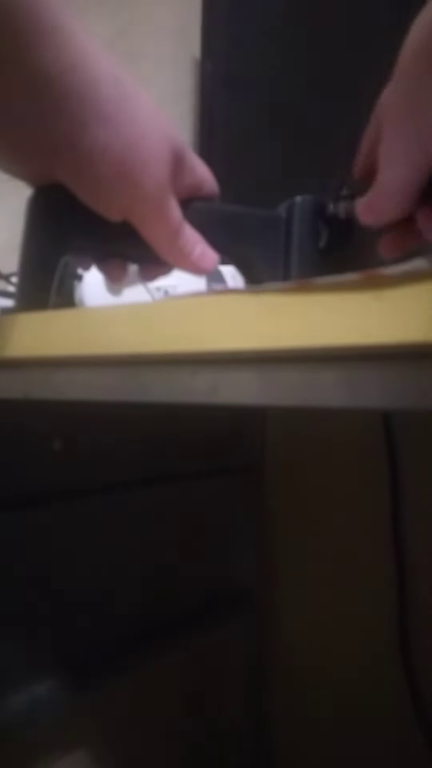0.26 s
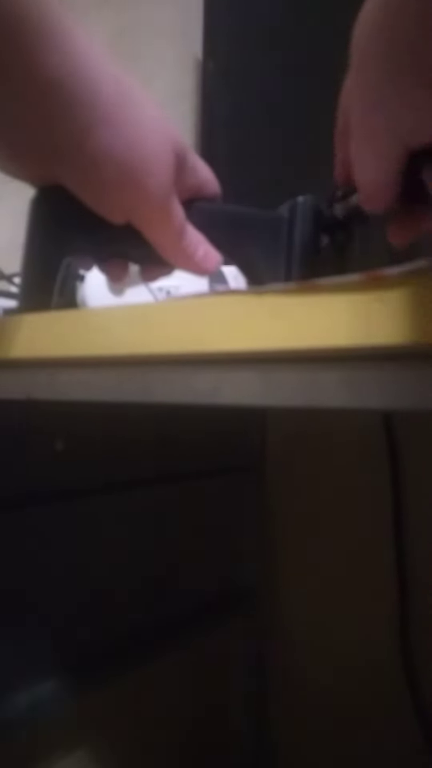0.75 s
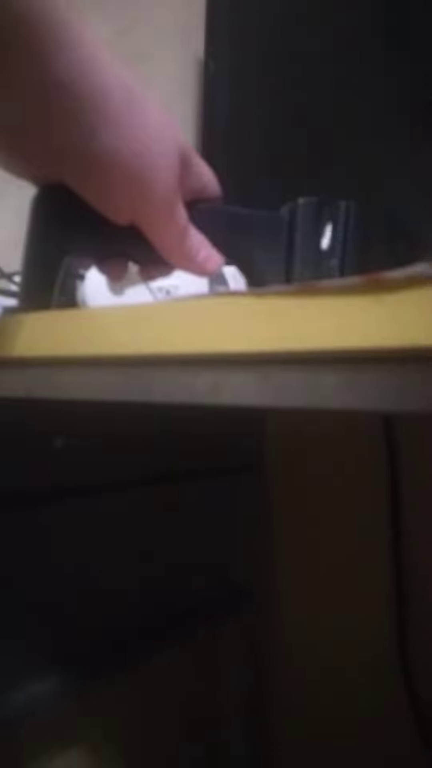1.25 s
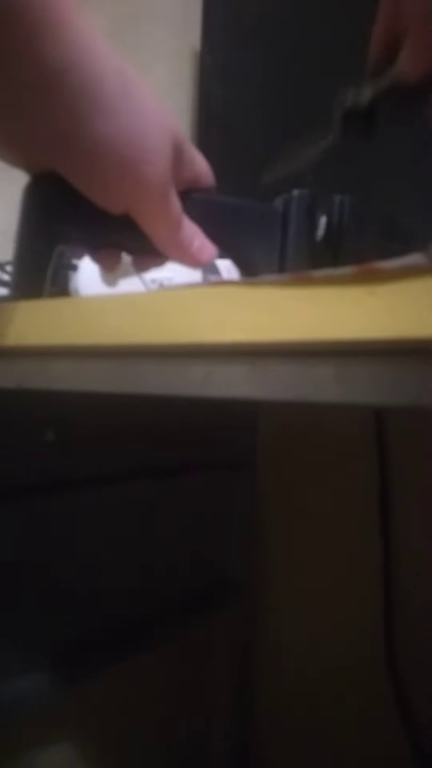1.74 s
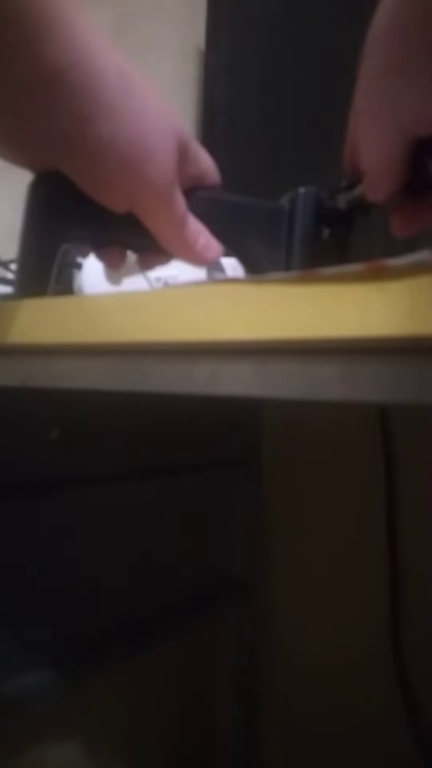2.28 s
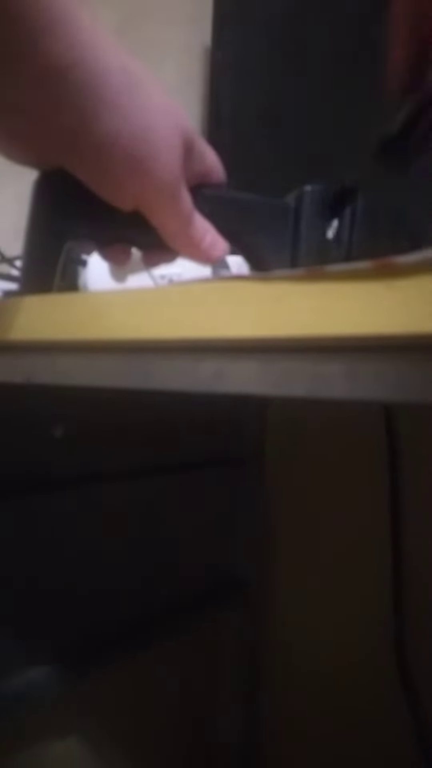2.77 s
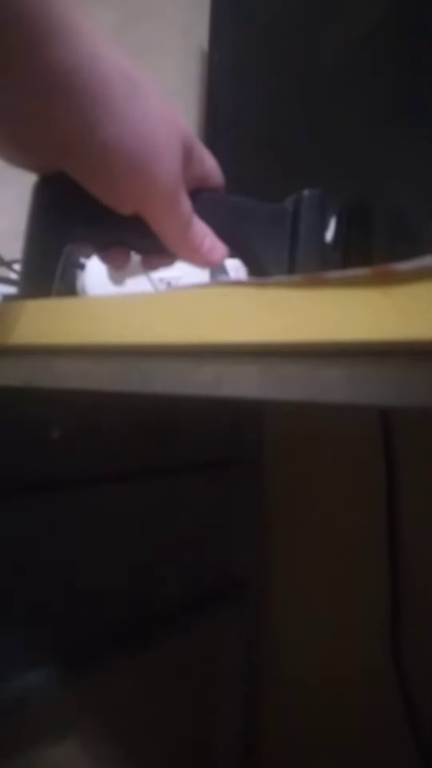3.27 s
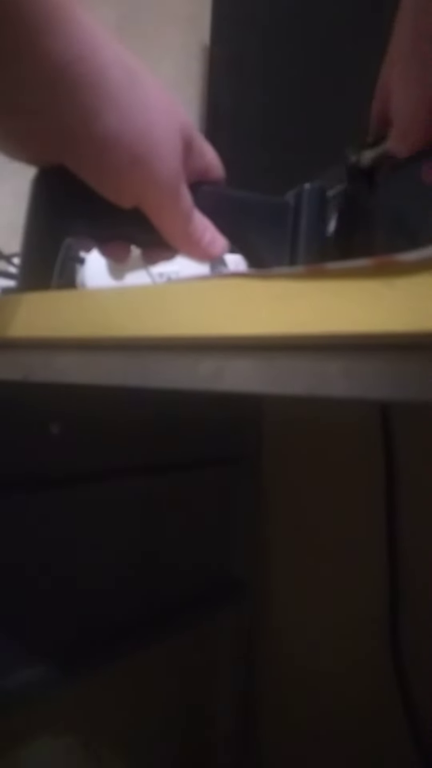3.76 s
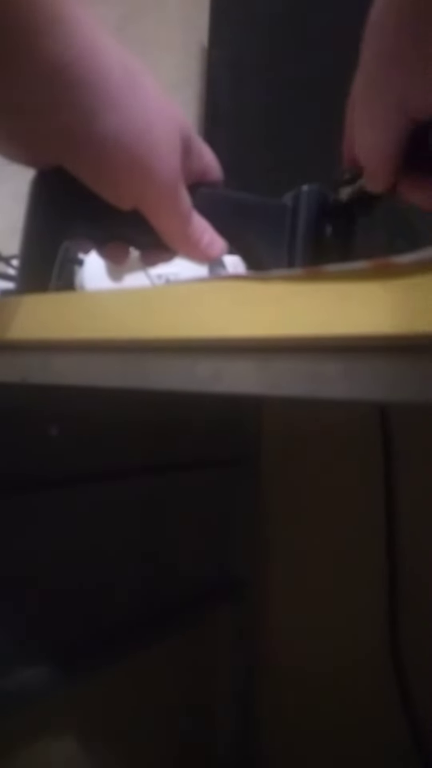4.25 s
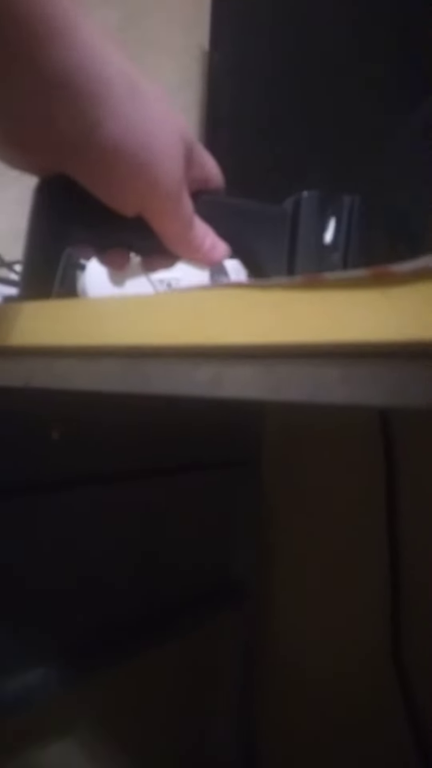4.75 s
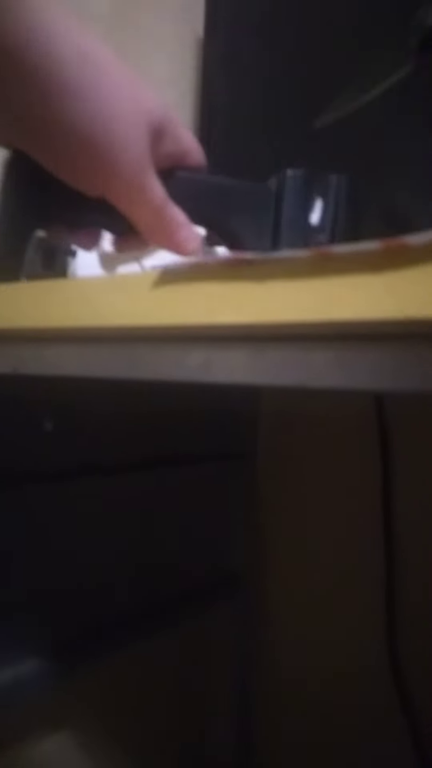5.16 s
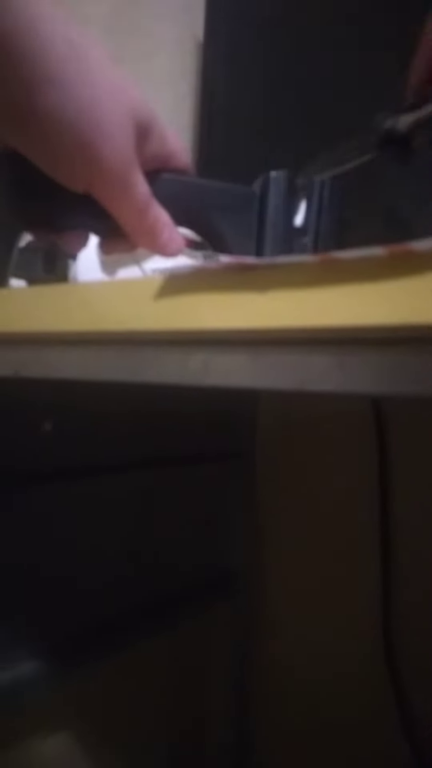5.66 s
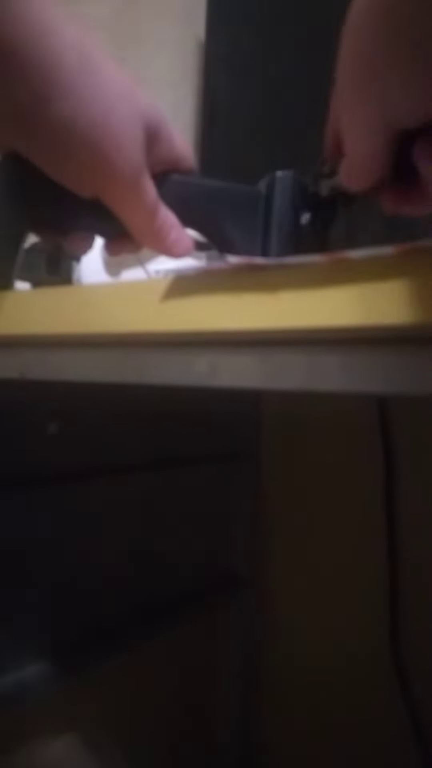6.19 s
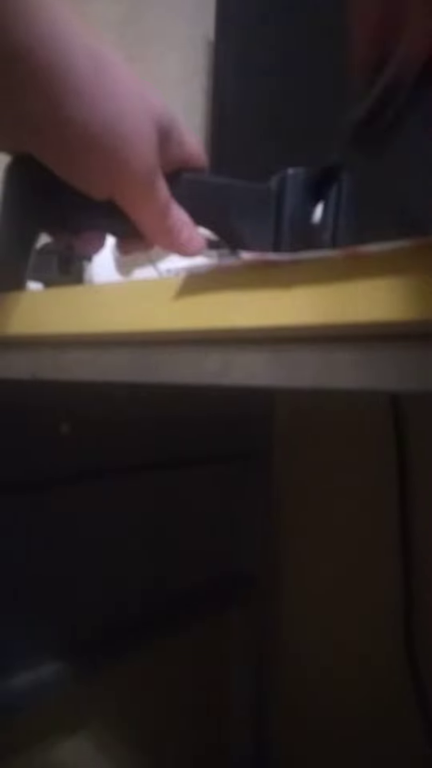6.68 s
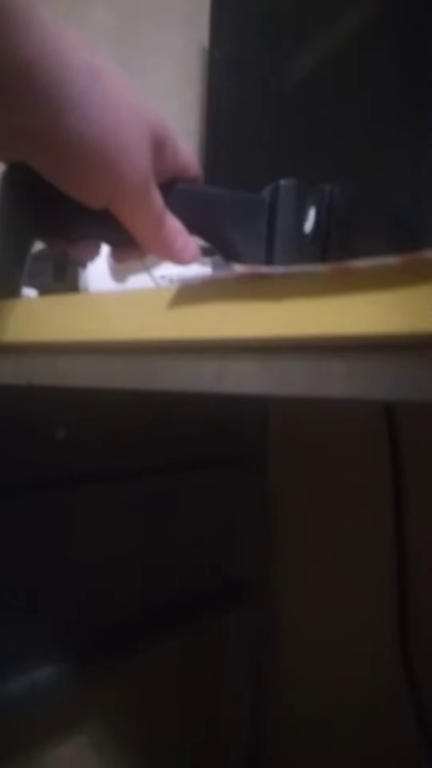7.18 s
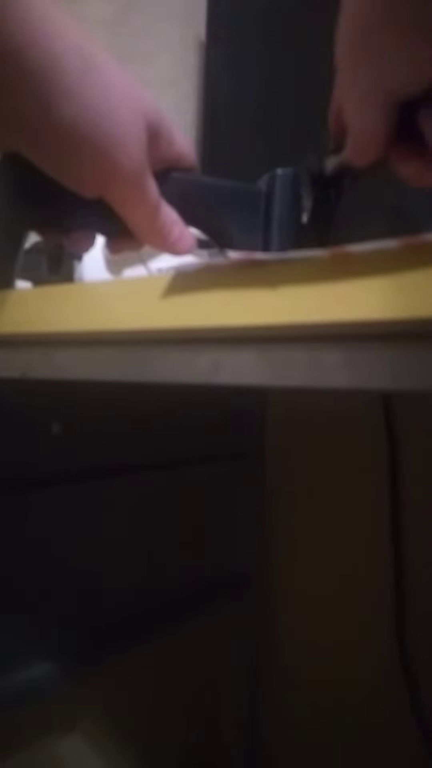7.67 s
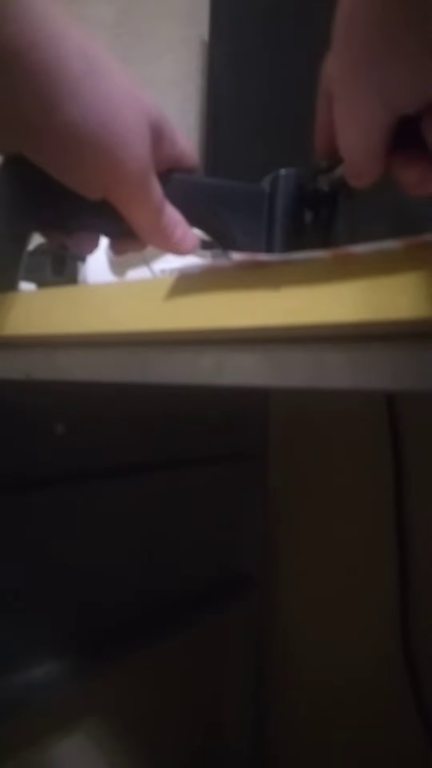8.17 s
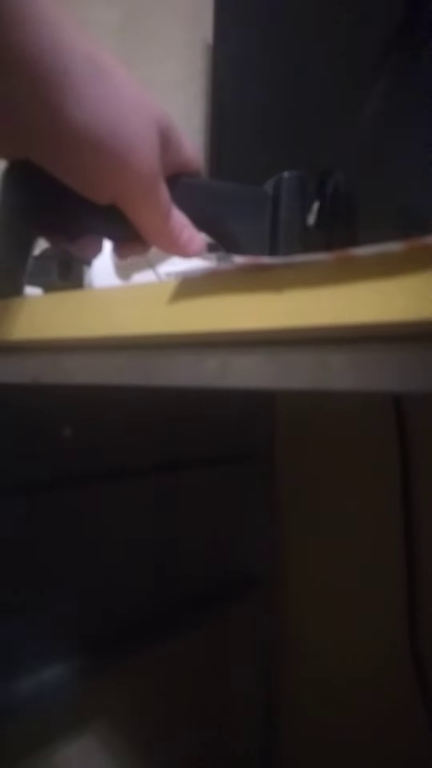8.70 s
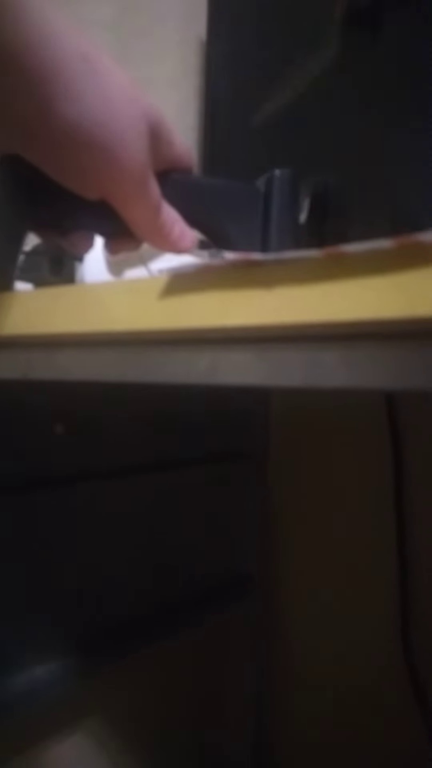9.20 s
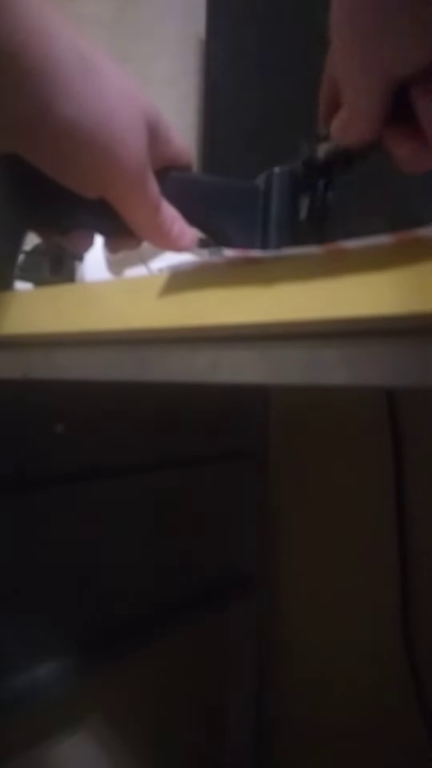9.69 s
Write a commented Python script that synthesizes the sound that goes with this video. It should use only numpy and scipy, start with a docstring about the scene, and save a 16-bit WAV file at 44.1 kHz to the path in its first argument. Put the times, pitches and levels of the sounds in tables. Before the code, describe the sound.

A blade is set into a plastic pull-through sharpener with a hollow thud and a bit of steel clatter, rests, then is drawn out in a short accelerating scrape that cuts off sharply. This repeats five times with uneven knocks and short near-silent gaps. The tabletop adds woody weight, and the freed tip sometimes clacks on the rim. Recorded close by a phone, sharpener stronger on one side, with short room echo and bassy hum.

```python
"""First a low, wavering room rumble, then knocks as a steel knife meets a plastic pull-through sharpener.
The blade is drawn over the grit five times. Bursts of noise make the knocks, random grains the strokes;
both ring housing, tabletop and blade in a small quiet room. Later the freed tip clacks on the rim.
A few dry ticks sound right at the phone lying close by, which hears with a near and a far port.
The phone widens the stereo by taking a delayed copy of each port from the other."""
import sys
import numpy as np
from scipy import signal
from scipy.fft import rfft, irfft, next_fast_len
from scipy.io import wavfile
from scipy.ndimage import uniform_filter1d

SR = 44100
rng = np.random.default_rng(int(sys.argv[2]) if len(sys.argv) > 2 else 0)


def store_pcm(level_fs):
    """Save levels as 16-bit WAV."""
    pcm = np.round(np.clip(level_fs, -1, 1) * 32767).astype(np.int16)
    wavfile.write(sys.argv[1], SR, np.atleast_2d(pcm).T)


def gain_from_db(level_db):
    """Turn a decibel level (scalar or array-like) into a linear amplitude factor."""
    decades = np.asarray(level_db, float) / 20
    return 10 ** decades


N = 438354  # length in samples

# background at the ports: (frequency [Hz], near port [dB per Hz], far port [dB per Hz], shared tone [dB per Hz])
BACKGROUND = [(24.8, -107, -103, -110), (45.5, -88, -81, -72.5), (71.4, -65, -82, -66),
              (109.7, -62, -65, -71.5), (162.5, -88.5, -74.5, -82), (230, -80, -100.5, -77.5),
              (467, -89.5, -100, -92), (730, -93.5, -121, -97), (1360, -104, -102, -112),
              (3110, -109, -107, -125), (6700, -116, -114, -135), (11700, -120, -118, -140),
              (12300, -117, -117, -140), (13400, -123, -121, -140)]
# low appliance tone: (frequency [Hz], level [dB])
APPLIANCE_TONES = [(75.4, -52)]
# knocks: (time [s], thud [dB], housing [dB], blade [dB], rattle decay [ms])
KNOCKS = [(0.138, -26.5, -39.5, -65, 0.68), (0.363, -34.5, -57, -81, 3.8),
          (0.514, -15.5, -25.5, -33.5, 4.4), (0.981, -42, -64, -49, 7.6), (1.149, -66, -47, -43, 1.7),
          (1.833, -26, -45, -78, 5.3), (1.9, -41.5, -57, -65, 2.3), (2.155, -23, -30.5, -37, 4.4),
          (2.261, -32, -37.5, -56, 5.9), (2.81, -37, -40.5, -48, 4), (3.575, -25.5, -39.5, -79, 3.9),
          (3.889, -16.5, -22, -27.5, 2.5), (4.024, -34.5, -35, -59, 2), (4.602, -32.5, -38, -35, 4.6),
          (5.765, -27, -38, -61, 5), (5.878, -39, -52, -59, 5), (6.028, -29, -42, -46, 7.7),
          (6.085, -29.5, -45, -43, 6.3), (6.111, -19.5, -27, -30.5, 3.15),
          (6.236, -32.5, -37.5, -53.5, 1.8), (6.724, -28.5, -42, -36.5, 5.8), (7.669, -39, -52, -75, 2.4),
          (7.721, -32.5, -40.5, -66, 3.4), (7.957, -37.5, -50, -66, 4.8), (7.996, -15, -17.5, -28, 3),
          (8.316, -55, -41.5, -63, 1.7), (8.693, -29.5, -46, -53, 1.3), (9.796, -26, -37, -40, 3)]
# the freed tip clacks on the rim: (time [s], thud [dB], housing [dB], blade [dB], rattle decay [ms])
CLACKS = [(4.647, -43, -38.5, -37, 5.7), (6.792, -47, -28.5, -34, 5.3), (8.801, -43, -31, -42.5, 5),
          (8.843, -60, -44.5, -51, 6.3)]
# middles of the thud, housing, blade and finest-treble bands: (frequency [Hz])
KNOCK_BANDS_HZ = [330, 1200, 3000, 10000]
# ringing of housing and tabletop: (frequency [Hz], level [dB], time to fall 60 dB [s], extra when rubbed [dB])
HOUSING = [(113, -3.5, 0.2, 0.5), (217, -9.5, 0.16, 6), (262.3, 3.5, 0.12, -2.5), (342, -3, 0.08, 2),
           (395.7, -2, 0.038, 2), (443.5, 1, 0.053, -2.5), (496.6, 0, 0.037, -1),
           (590.6, -16.5, 0.073, 8.5), (695, 0.5, 0.027, 1.5), (819, -12, 0.047, 0.5),
           (867, -1, 0.04, -0.5), (1015, -4, 0.019, 12), (1175, 2, 0.017, -0.5), (1295, -6.5, 0.058, -2),
           (1410, -9.5, 0.031, 5), (1580, -3, 0.0098, 5.5), (1896, -5, 0.025, -3)]
# ringing of the blade: (frequency [Hz], level [dB], time to fall 60 dB [s])
BLADE = [(1980, -2.5, 0.016), (2547, -3.5, 0.018), (3024, -4.5, 0.022), (3380, -9.5, 0.036),
         (3860, -8.5, 0.045), (4195, 1, 0.022), (5000, -14.5, 0.044), (5910, -3.5, 0.017),
         (7730, -1.5, 0.0078), (8900, -4, 0.0051), (12700, -7, 0.008)]
# ringing of the rim: (frequency [Hz], level [dB], time to fall 60 dB [s])
RIM = [(493, -7, 0.044), (793, -7.5, 0.042), (909, 4.5, 0.024), (1070, -1, 0.013), (1350, -13, 0.052),
       (1380, 1, 0.041), (1770, 0, 0.045), (2535, 1.5, 0.035), (3543, 1.5, 0.023), (4360, -10, .02),
       (5620, 0, .03), (7460, -8, .015), (9300, -19, .015)]
# echo of the room: (frequency [Hz], time to fall 60 dB [s])
ROOM = [(100, 0.12), (500, 0.51), (2000, 0.29), (6000, 0.23), (14000, 0.087)]
# colour of the grit's hiss: (frequency [Hz], relative level [dB per Hz])
HISS = [(1500, 17), (2300, 12.5), (4500, 18), (7000, 8), (11000, 11.5), (14500, -2)]
# draws: (starts to move [s], at full speed [s], tip leaves [s], housing change [dB], steel change [dB])
DRAWS = [(0.856, 1.03, 1.146, -0.5, 1), (2.512, 2.76, 2.83, -4, 0), (4.32, 4.55, 4.598, -2.5, 0),
         (6.468, 6.659, 6.725, 0.5, 0), (8.489, 8.59, 8.692, 1.5, 0.5)]
# short slides, most of them ending in a knock: (start [s], end [s], level change [dB])
SLIDES = [(0.433, 0.518, 1), (6.035, 6.107, 1), (7.624, 7.723, -4), (7.937, 7.996, 2.5),
          (9.913, 9.942, -5.5)]
# Each list below has one number for tabletop rumble, housing drag, blade rasp and fine hiss, in this order.
# level of a draw at full speed: (level [dB])
FULL_DB = [-42.5, -47, -45.5, -54.5]
# gain from the start of a draw to full speed: (gain [dB])
SWELL_DB = [27, 24, 29.3, 29.5]
# bend of that gain; over 1, most of it comes early: (exponent [no unit])
SWELL_BEND = [1.2, 1.16, 0.96, 0.93]
# change on the way to the thin tip: (change [dB])
TIP_DB = [-8, -12.5, -2, 4.5]
# fall after the tip has left: (speed of fall [dB per s])
LIFT_DB_PER_S = [200, 400, 810, 1010]
# blade resting in the slot, pressed by the hand: (level [dB])
SEATED_DB = [-54.5, -74, -83, -97]
# level at the end of a slide: (level [dB])
SLIDE_DB = [-38, -48, -53.5, -67]
# the blade settling after a knock, against that knock: (level [dB])
SHUDDER_DB = [-8.5, -13.5, -15, -23]
# how fast the settling fades: (speed of fall [dB per s])
SHUDDER_DB_PER_S = [169, 242, 230, 260]
# faint rustle with the knife in the air: (start [s], end [s], levels of the four layers [dB])
RUSTLE = (5.03, 5.25, [-81, -77, -70.5, -75])
# ticks at the phone: (time [s], snap [dB], fizz [dB], far against near port [dB], decay [ms])
TICKS = [(1.527, -27, -30, -19, 0.063), (5.699, -61, -79, -4, 0.25), (8.318, -37, -44, -14, 0.33)]
# far port against near port: (frequency [Hz], level [dB])
SHADOW = [(100, -11), (400, -11), (1000, -4.5), (3000, -38), (14000, -27)]
# how much of the other port is taken away: (frequency [Hz], share [no unit])
WIDEN = [(100, 0.49), (1000, 0.67), (2100, 0.87), (4200, 0.65), (6300, 0.47), (8400, 0.18), (10500, 0.024),
         (14000, 0.06)]

RISE_MS, CRACK_MS, CRACK_DB, BLOW_DB, SCATTER_DB = 2.1, 0.8, 18, -7, 1.5
KNOCK_EDGE_DB, CLACK_EDGE_DB = -2.5, -14  # the finest treble against the blade
ROOM_DB, ROOM_SHARED_HZ = -10, 520  # below this frequency the ports mostly share their echo
GRIT_PER_S, GRIT_DB, JUDDER_DB = 6000, 3.5, 2.2  # grains on average; spread of grain size and of pressure
SEATED_S, FIDGET_DB = 0.38, 2.5  # rest before a draw; unevenness of the hand
SLIDE_SWELL_DB, SHUDDER_RISE_S = 21, 0.0047
SING_HZ, SING_T60_S, SING_DB, SING_SWELL_DB = 992, 0.044, -51.5, 10.5
FAR_LAG_MS, TONE_LAG_MS, WIDEN_LAG_MS = 0.088, -0.018, 0.4772  # a minus sign means earlier
PORT_DB, LEFT_DB, TOP_HZ = -1, 0.5, 14300


def on_log(hz, table_hz, values):
    """Reads a table with straight lines on a log-frequency axis."""
    return np.interp(np.log(hz + 1), np.log(table_hz), values)


def shape(x, gain):
    """Filters a sound by gain(Hz)."""
    size = next_fast_len(x.shape[-1] + 4096)
    spectrum = rfft(x, size) * gain(np.fft.rfftfreq(size, 1 / SR))
    return irfft(spectrum, size)[..., :x.shape[-1]]


def late(hz, ms):
    """A pure delay: each frequency is turned by its share of a cycle."""
    return np.exp(-2j * np.pi * hz * ms / 1000)


def split(x, at_hz):
    """The parts under and over a frequency."""
    low = shape(x, lambda hz: 1 / (1 + (hz / at_hz) ** 6))
    return low, x - low


def unit(x):
    """Scales to an rms of 1."""
    return x / np.sqrt(np.mean(x ** 2))


def walk(rate):
    """A slow random wander: levels held for 1 / rate seconds and smoothed twice, with rms 1."""
    k = int(SR / rate)
    held = np.repeat(rng.standard_normal(N // k + 1), k)
    return unit(uniform_filter1d(uniform_filter1d(held, k), k)[:N])


def column(values):
    """One row per layer."""
    return np.array(values, float)[:, None]


def between(t, start, end):
    """1 from start to end, else 0."""
    return (t >= start) & (t < end)


def appliance():
    """Each low tone is a sine whose level wavers."""
    t = np.arange(N) / SR
    return sum(gain_from_db(db + 1.25 * walk(2.13)) * 2 * np.sin(2 * np.pi * hz * t) for hz, db in APPLIANCE_TONES)


def background():
    """Each port's own rumble and hiss, and a room tone that both hear; all of it wavers."""
    hz, *levels = np.transpose(BACKGROUND)
    near, far, tone = (shape(rng.standard_normal(N), lambda f: gain_from_db(on_log(f, hz, db)) * np.sqrt(SR / 2))
                       for db in levels)
    near += appliance()
    far_tone = shape(tone, lambda f: late(f, TONE_LAG_MS))
    return gain_from_db(1.0 * walk(2.907)) * np.array([near + tone, far + far_tone])


def ring(modes, extra_db=0, sense=-1.):
    """A struck body's ring is a sum of fading sines; with sense -1 neighbours swing opposite ways."""
    hz, db, t60 = np.transpose([m[:3] for m in modes])[:, :, None]
    t = np.arange(SR // 4) / SR
    sign = sense ** np.arange(len(modes))[:, None]
    fade = 1000. ** (-t / t60)
    return np.sum(sign * gain_from_db(db + extra_db) * np.sin(2 * np.pi * hz * t) * fade, axis=0)


def knocks(events, modes, edge_db):
    """A short rattle of contacts rings all modes, a little differently each time, over a dry crack."""
    out = np.zeros(N + SR)
    t = np.arange(SR // 4) / SR
    for s, thud_db, housing_db, blade_db, rattle_ms in events:
        crack = gain_from_db(CRACK_DB) * rng.standard_normal(len(t)) * np.exp(-1000 * t / CRACK_MS)
        scatter_db = SCATTER_DB * rng.standard_normal((len(modes), 1))
        body = ring(modes, scatter_db, sense=1.) + split(crack, 250)[1]
        push = np.exp(-1000 * t / max(rattle_ms, .2)) * (1 - np.exp(-1000 * t / RISE_MS))
        rattle = push * rng.standard_normal(len(t))
        rattle /= np.sqrt(np.sum(rattle ** 2))
        # one firm contact, 1 ms in, joins the rattle
        rattle[SR // 1000] += gain_from_db(BLOW_DB)
        blow = split(signal.fftconvolve(rattle, body)[:len(t)], 150)[1]
        levels_db = (thud_db, housing_db, blade_db, blade_db + edge_db)
        for db, share in zip(levels_db, np.eye(4)):
            band = shape(blow, lambda hz: on_log(hz, KNOCK_BANDS_HZ, share))
            # the peak is read from the loudest 200 samples
            peak = np.sqrt(2 * uniform_filter1d(band ** 2, size=200).max())
            out[int(s * SR):][:len(t)] += gain_from_db(db) * band / peak
    return out[:N]


def room():
    """Fading noise stands for the echoes to both ports, alike in the bass; the treble dies first."""
    t = np.arange(SR // 2) / SR
    tails = 0
    band_hz = np.transpose(ROOM)[0]
    for (hz, t60), share in zip(ROOM, np.eye(len(ROOM))):
        both, *own = rng.standard_normal((3, len(t)))
        mix = 1 / (1 + (hz / ROOM_SHARED_HZ) ** 2)
        noise = np.sqrt(mix) * both + np.sqrt(1 - mix) * np.array(own)
        band = shape(noise, lambda f: on_log(f, band_hz, share))
        tails = tails + band * 1000. ** (-t / t60)
    # the echo starts just after the direct sound
    tails = tails * np.clip(t / 0.00089 - .5, 0, 1)
    return gain_from_db(ROOM_DB) * tails / np.sqrt(np.sum(tails ** 2) / 2)


def grit():
    """Grains of uneven size catch the edge at random moments; the pressure judders."""
    caught = rng.random(N) < GRIT_PER_S / SR
    grains = caught * rng.standard_normal(N) * gain_from_db(GRIT_DB * rng.standard_normal(N))
    return grains * gain_from_db(JUDDER_DB * walk(60))


def add_shudder(gains, t):
    """After each knock or clack the blade settles, so it rubs briefly and fades."""
    for events, edge_db in (KNOCKS, KNOCK_EDGE_DB), (CLACKS, CLACK_EDGE_DB):
        for s, thud_db, housing_db, blade_db, _ in events:
            at = slice(int(s * SR), int(s * SR) + SR // 2)
            since = t[at] - s
            blow_db = column([thud_db, housing_db, blade_db, blade_db + edge_db])
            rise = np.clip(since / SHUDDER_RISE_S - .5, 0, 1)
            gains[:, at] += rise * gain_from_db(blow_db + column(SHUDDER_DB) - column(SHUDDER_DB_PER_S) * since)


def add_slides(gains, t):
    """Short rubs that swell up to their end."""
    for start, end, db in SLIDES:
        at = slice(int(start * SR), int(end * SR))
        left = (end - t[at]) / (end - start)
        gains[:, at] += gain_from_db(db + column(SLIDE_DB) - SLIDE_SWELL_DB * left)


def add_draws(gains, sing, t):
    """The blade rests, gathers speed, thins to the tip and leaves; the slot sings as it moves."""
    fidget = FIDGET_DB * walk(14)
    for start, full, leave, housing_db, steel_db in DRAWS:
        at = slice(int((start - SEATED_S) * SR), int(leave * SR) + SR // 2)
        now = t[at]
        db = column([housing_db, housing_db, steel_db, steel_db])
        # short of full speed: 1 to 0; then along the blade: 0 to 1
        short = np.clip((full - now) / (full - start), 0, 1)
        along = np.clip((now - full) / (leave - full), 0, 1)
        fall = column(SWELL_DB) * short ** column(SWELL_BEND)
        fall = fall + column(LIFT_DB_PER_S) * np.clip(now - leave, 0, None)
        gains[:, at] += (now >= start) * gain_from_db(db + column(FULL_DB) + column(TIP_DB) * along - fall)
        gains[:, at] += (now < full) * gain_from_db(column(SEATED_DB) + fidget[at])
        sing_db = housing_db + SING_DB - SING_SWELL_DB * short
        sing[at] += between(now, start, leave) * gain_from_db(sing_db) * (1 - along)


def add_rustle(gains, t):
    """A faint rustle at a steady gain while the knife is in the air."""
    start, end, levels_db = RUSTLE
    gains += between(t, start, end) * gain_from_db(column(levels_db))


def contact():
    """Gains over time of the four grit layers and the singing slot, with softened corners."""
    t = np.arange(N) / SR
    gains, sing = np.zeros((4, N)), np.zeros(N)
    add_shudder(gains, t)
    add_slides(gains, t)
    add_draws(gains, sing, t)
    add_rustle(gains, t)
    return uniform_filter1d(np.vstack([gains, sing]), size=300)


def strokes():
    """The grit shakes tabletop and housing, rings the blade and hisses."""
    drag = signal.fftconvolve(grit(), ring(HOUSING, np.transpose(HOUSING)[-1, :, None]))[:N]
    hiss = unit(shape(grit(), lambda hz: gain_from_db(on_log(hz, *np.transpose(HISS)))))
    blade = unit(signal.fftconvolve(grit(), ring(BLADE))[:N])
    rasp = gain_from_db(-1.5) * blade + hiss
    sing = signal.fftconvolve(grit(), ring([(SING_HZ, 0, SING_T60_S)]))[:N]
    layers = *split(drag, 620), *split(rasp, 6200), sing
    return sum(gain * unit(layer) for gain, layer in zip(contact(), layers))


def ticks():
    """Fast-fading noise makes bare clicks, too close and faint to wake the room."""
    out = np.zeros((2, N))
    t = np.arange(SR // 50) / SR
    for s, snap_db, fizz_db, far_db, ms in TICKS:
        noise = rng.standard_normal(len(t)) * np.exp(-1000 * t / max(ms, .1))
        snap, fizz = split(split(noise, 350)[1], 6000)
        snap = shape(snap, lambda hz: 1 / np.hypot(1, hz / 1500))
        click = gain_from_db(snap_db) * snap / np.abs(snap).max()
        click = click + gain_from_db(fizz_db) * fizz / np.abs(fizz).max()
        out[:, int(s * SR):][:, :len(t)] += gain_from_db(np.array([[0], [far_db]])) * click
    return out


def scene():
    """The sharpener is by the near port; the phone's body shades the far one, less so from the echo."""
    sound = knocks(KNOCKS, HOUSING + BLADE, KNOCK_EDGE_DB) + knocks(CLACKS, RIM, CLACK_EDGE_DB)
    sound = sound + strokes()
    shadow_hz, shadow_db = np.transpose(SHADOW)
    far = shape(sound, lambda hz: gain_from_db(on_log(hz, shadow_hz, shadow_db)) * late(hz, FAR_LAG_MS))
    echo = signal.fftconvolve(sound[None], room(), axes=1)[:, :N]
    echo[1] = shape(echo[1], lambda hz: gain_from_db(0.38 * on_log(hz, shadow_hz, shadow_db)))
    return gain_from_db(PORT_DB) * (np.array([sound, far]) + echo) + ticks() + background()


def top_cut(x):
    """Nothing passes above the cut-off."""
    return signal.sosfilt(signal.butter(12, 14990, fs=SR, output="sos"), x)


def record(dry):
    """Each channel loses a delayed, dulled copy of the other port; the top is cut."""
    other = shape(dry[::-1], lambda hz: on_log(hz, *np.transpose(WIDEN)) * late(hz, WIDEN_LAG_MS))
    wide = (dry - other) * gain_from_db(np.array([[LEFT_DB], [-LEFT_DB]]))
    # above TOP_HZ the level falls 1 dB every 35 Hz, for 2000 Hz
    mix = shape(wide, lambda hz: gain_from_db(-np.clip(hz - TOP_HZ, 0, 2000) / 35))
    return top_cut(mix)


dry = scene()
out = record(dry)
store_pcm(out)
```